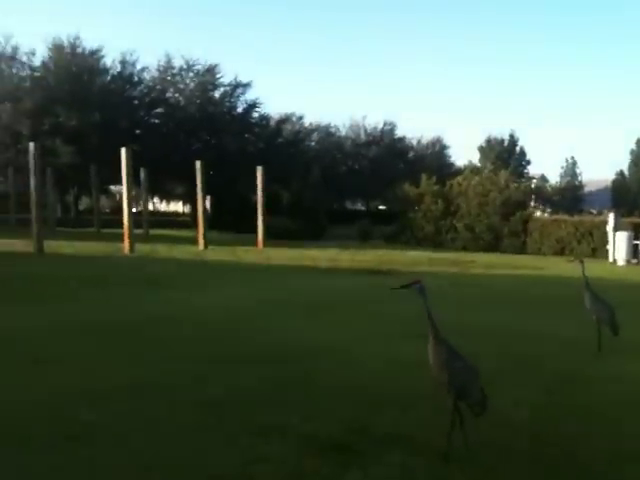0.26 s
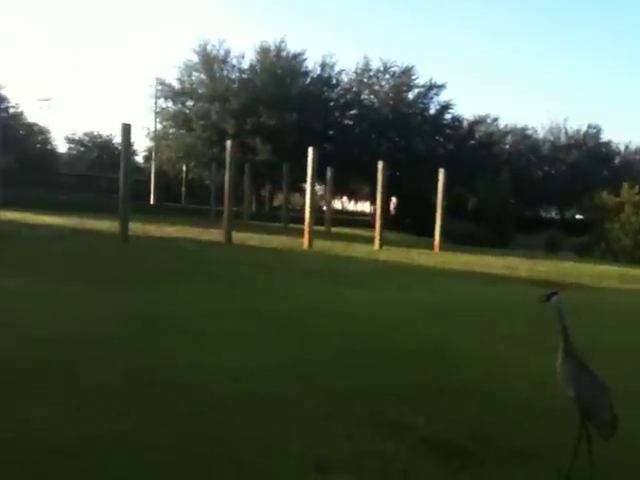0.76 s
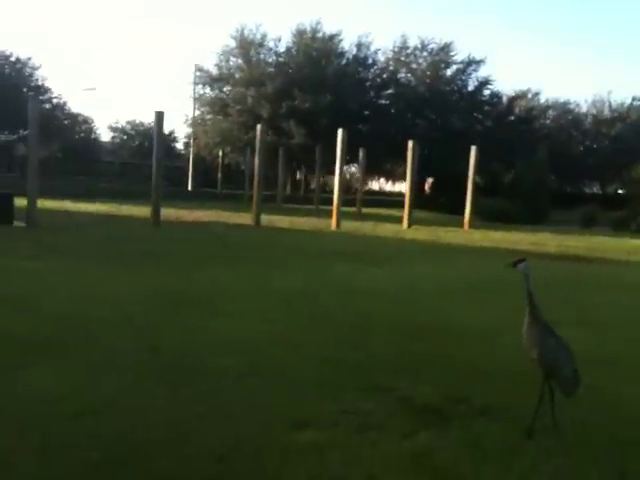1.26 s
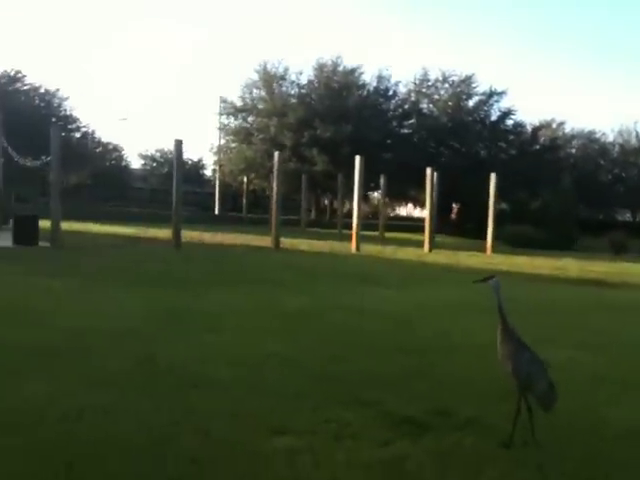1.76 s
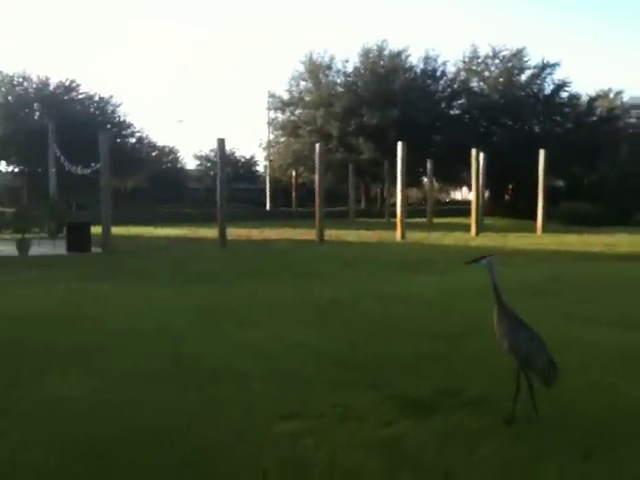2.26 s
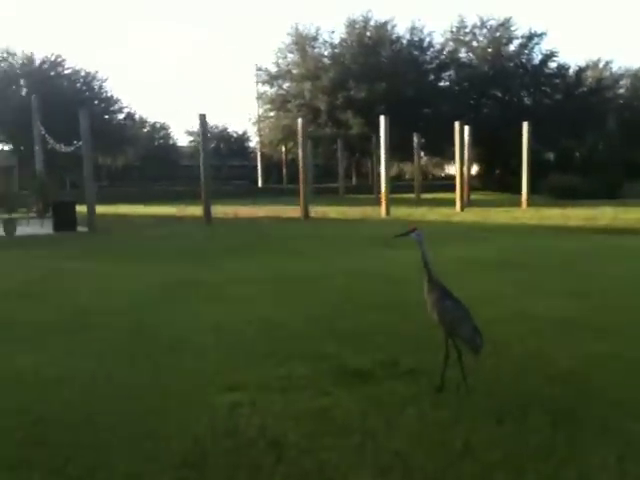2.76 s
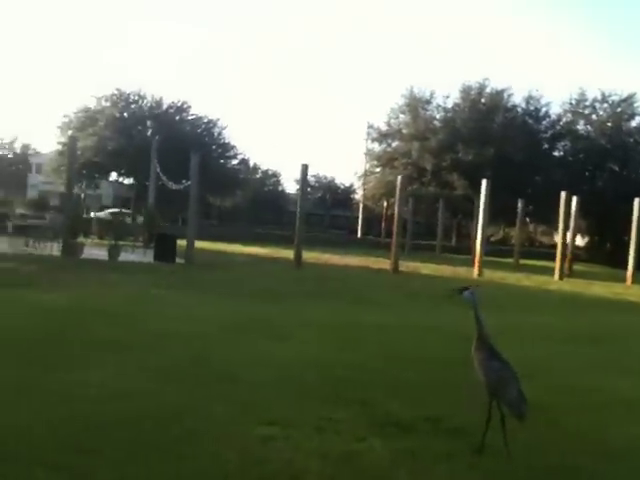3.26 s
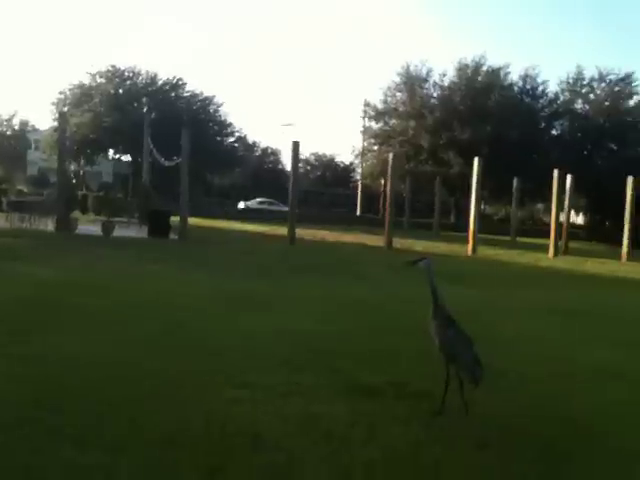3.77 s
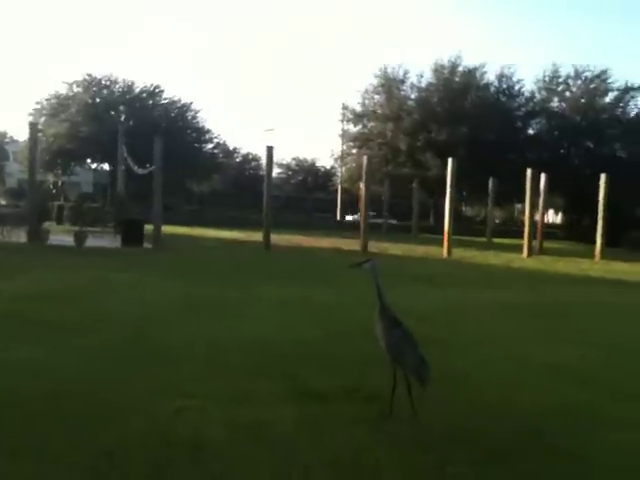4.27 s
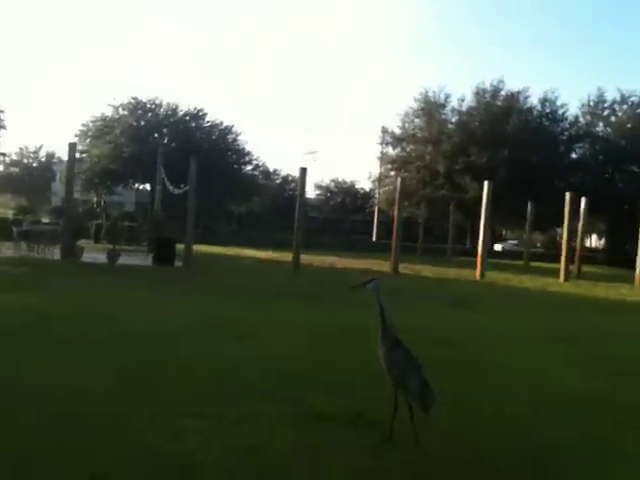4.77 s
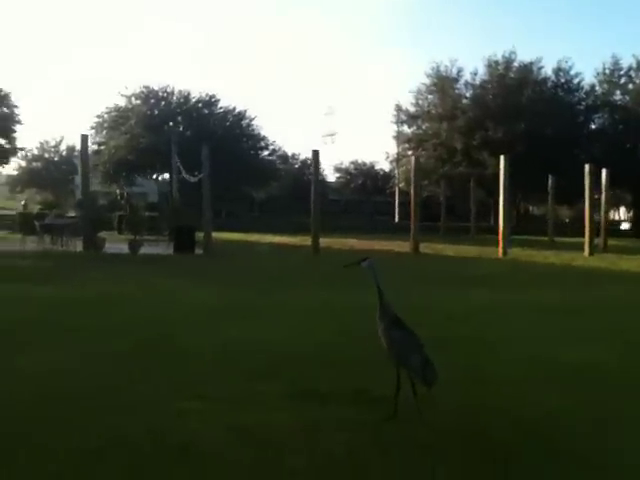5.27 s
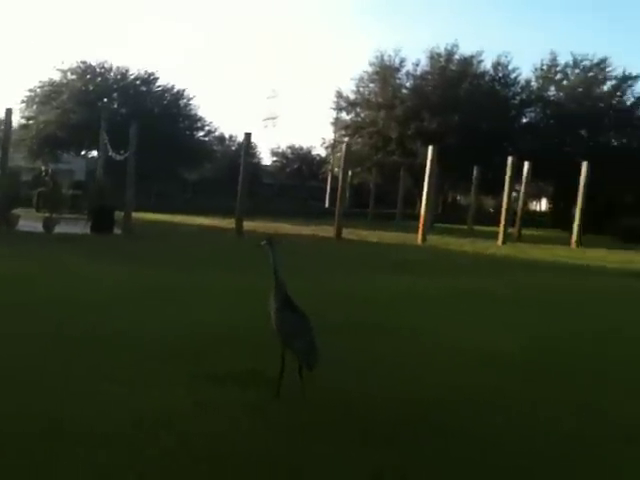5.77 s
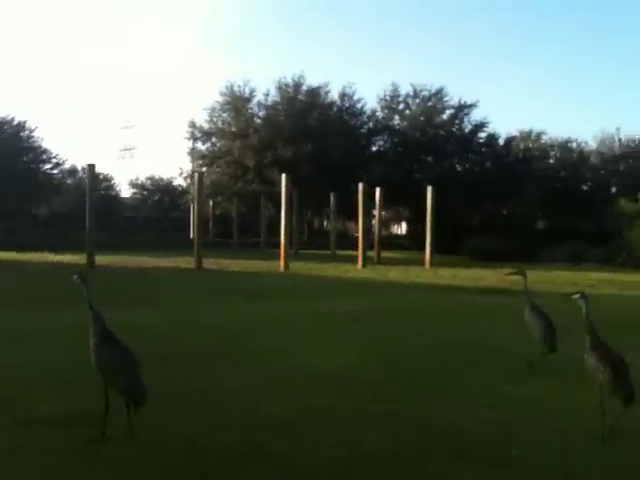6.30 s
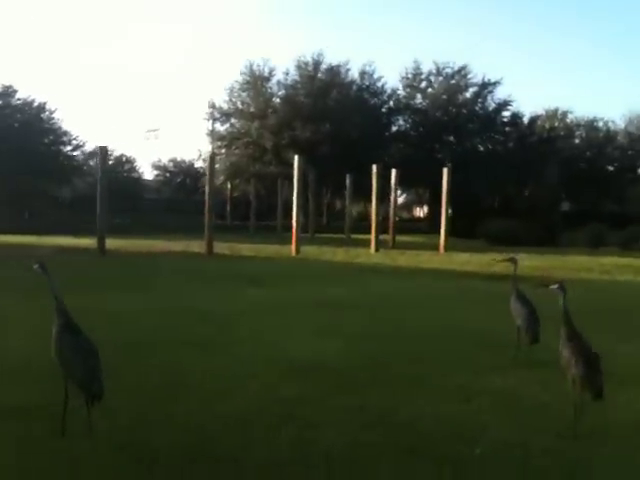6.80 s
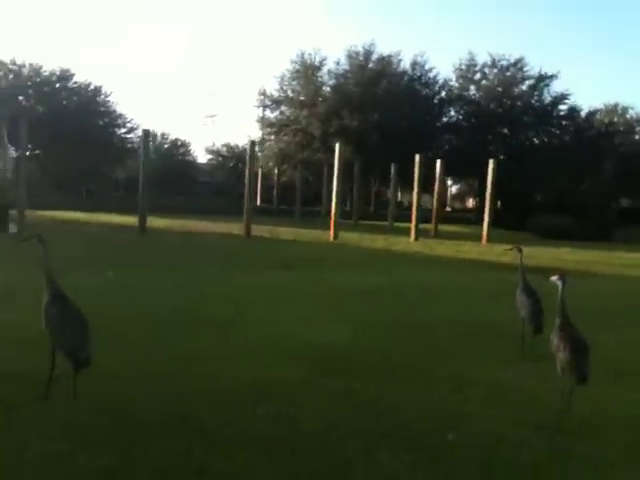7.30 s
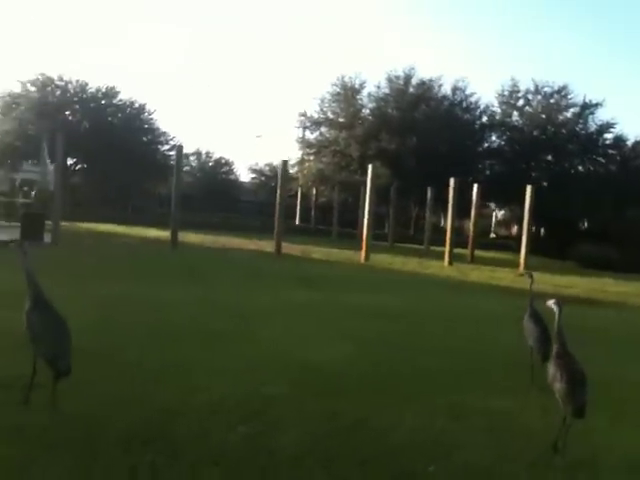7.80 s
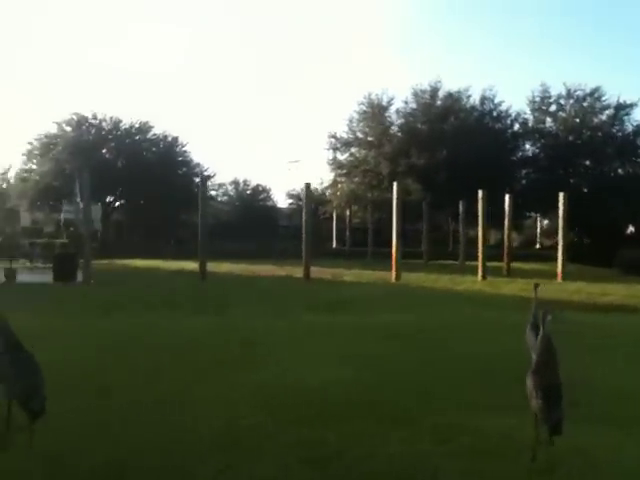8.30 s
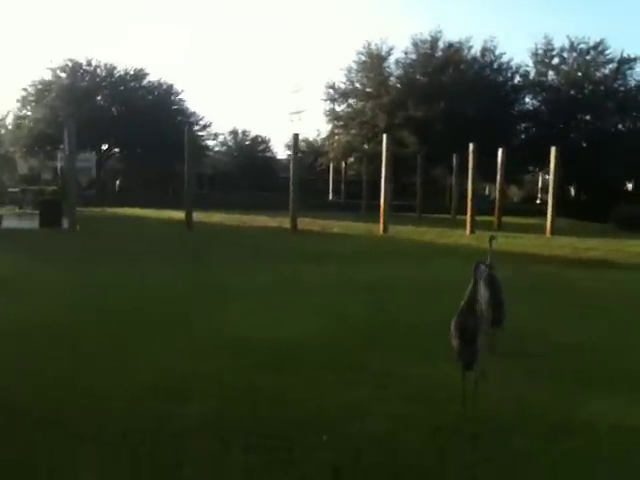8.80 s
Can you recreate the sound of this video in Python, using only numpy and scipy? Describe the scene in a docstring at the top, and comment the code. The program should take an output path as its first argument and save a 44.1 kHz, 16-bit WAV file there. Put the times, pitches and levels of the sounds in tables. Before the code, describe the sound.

Loud, rolling rattles from a pair of cranes come in four short duets outdoors. One bird leads with a brief honk and a run of quick bugling notes that sink and fade, and its higher partner answers before it finishes. The birds sound near the microphone and echo faintly off the trees. Between duets there is only a quiet low hum, far traffic and, in the first few seconds, two faint distant hoots.

```python
"""Two sandhill cranes duetting on a lawn.

Four duets: each bird gives a short rising honk, then a rattle of about 17 notes a second.
Each note is a bugle blast from snapping membranes, then weaker surges as the long windpipe rings on.
The lower bird leads, the higher one answers. Trees and houses echo them
over a low hum, a distant road and two faint hoots."""
import sys
import numpy as np
from scipy import signal
from scipy.fft import rfft, irfft
from scipy.io import wavfile

SR = 44100
rng = np.random.default_rng(int(sys.argv[2]) if len(sys.argv) > 2 else 0)


def waveform_to_disk(signal):
    """Save audio, clipped to [-1, 1], as 16-bit WAV at the path in sys.argv[1]."""
    frames = np.transpose(np.atleast_2d(signal))
    scaled = np.clip(frames, -1, 1) * 32767
    samples = np.round(scaled).astype(np.int16)
    wavfile.write(sys.argv[1], SR, samples)


N = 399105
TOP_HZ = 16200


def undb(db):
    """Decibels to gain."""
    return 10 ** (np.asarray(db) / 20)


def colour_db(hz, points):
    """Interpolate (Hz, dB) points on a log-frequency axis."""
    point_hz, db = np.transpose(points)
    return np.interp(np.log(hz + 1), np.log(point_hz), db)


def tint(x, points):
    """Equalise by (Hz, dB) points."""
    hz = np.fft.rfftfreq(len(x), 1 / SR)
    return irfft(rfft(x) * undb(colour_db(hz, points)), len(x))


def walk(size, rate_hz):
    """Smooth random drift, spread near 1."""
    at = np.arange(size) * rate_hz / SR
    knots = int(at[-1]) + 2
    return np.interp(at, np.arange(knots), rng.standard_normal(knots))


def resonate(x, hz, width_hz):
    """One resonance, unity gain at its centre."""
    return signal.lfilter(*signal.iirpeak(hz, hz / width_hz, fs=SR), x)


def add(track, start_s, sound):
    """Mix a sound into a track."""
    i = int(start_s * SR)
    track[i:i + len(sound)] += sound[:N - i]


# Overtone colour of each throat. Each row: frequency in Hz, gain in dB.
LOW_THROAT = [(1100, 11.5), (1450, -4.5), (1800, 1.5), (2150, -2.5), (2450, -12), (2900, -0.5),
              (3700, -1.5), (4600, -3), (5500, -3.5), (7000, -9.5), (10000, -16), (15000, -22.5)]
HIGH_THROAT = [(1200, 8), (1500, -8), (1750, 0.5), (2050, -2.5), (2450, -15.5), (3200, -2), (4300, -2),
               (6400, -3.5), (7500, -10.5), (10000, -13.5), (15000, -27.5)]

def syrinx(hz, throat, edge_db, turbulence):
    """Membranes snap shut once a cycle; returns the fundamental and the turbulent overtones."""
    phase = 2 * np.pi * (np.cumsum(hz) / SR + rng.random())
    k = np.arange(2, 30)[:, None]
    # A harder snap (edge) lifts the top octaves.
    top = np.clip(np.log(k * hz / 2300) / np.log(9000 / 2300), 0, 1)
    overtone_db = colour_db(k * hz, throat) + top * edge_db + 1.7 * rng.standard_normal(k.shape)
    gains = undb(overtone_db) * (k * hz < TOP_HZ)
    shake = np.array([walk(len(hz), 910) + 1j * walk(len(hz), 900) for _ in k])
    flutter = 1 + turbulence * (1 + top) * shake
    overtones = gains * np.real(flutter * np.exp(1j * k * (phase + np.pi / 4)))
    return -np.sqrt(2) * np.cos(phase), -np.sqrt(2) * overtones.sum(axis=0)


# Rattles. Each row: start in seconds, end in seconds, note count, pitch in Hz, share of pitch lost,
# level in dB, fade in dB, rasp (all overtones) in dB, edge (top overtones) in dB,
# later surges in dB, closing pitch in Hz, closing level in dB.
LOW_RATTLES = [(.6196, 1.031, 8, 953, 0.13, -12, 7, -14.5, 0, -14.5, 548, -36.5),
               (3.2571, 3.676, 8, 975.6, .12, -14.5, 11.5, -15.5, 2.5, -10.5, 520, -40.5),
               (5.5986, 5.961, 7, 961, 0.11, -18, 8, -16, -8, -9.5, 498, -40),
               (7.5635, 7.925, 7, 963, 0.12, -20, 8, -14.5, -8, -6.5, 547, -40.5)]
HIGH_RATTLES = [(.8275, 1.357, 10, 1126, .17, -23.5, 1.5, -8, -5.5, -4, 650, -37.5),
                (3.4985, 4.0335, 10, 1110, 0.16, -20, 5.6, -9, -2.5, -6, 645, -35.5),
                (6.0575, 6.5345, 9, 1066, .1, -20.5, 5, -9.5, -14.5, -7, 616.4, -40.5),
                (7.9322, 8.405, 9, 1067, 0.05, -17, 5.1, -10, -28.5, -13.5, 851, -31)]
# How each bird starts, tires and closes a rattle: keywords of breath_notes.
LOW_HABIT = dict(sag_power=2, fade_power=3.2, soft_start_db=-0.25, flat_start=0.0097, rasp_gain_db=4, edge_loss_db=3.5, surge_gain_db=6.5, soft_surge_db=-1.5, close_rasp_db=-16, close_edge_db=-13.5, close_surge_db=-6)
HIGH_HABIT = dict(sag_power=3.53, fade_power=3.1, soft_start_db=4.5, flat_start=0.027, rasp_gain_db=0, edge_loss_db=0.6, surge_gain_db=2.5, soft_surge_db=5.5, close_rasp_db=-9.5, close_edge_db=-26, close_surge_db=-9)
# Note-to-note spread: share of pitch, then level, rasp, edge and later surges in dB.
NOTE_SCATTER = (.011, .5, .9, 1.2, 1.4)

def breath_notes(rattles, quicken, close_late_s, sag_power, fade_power, soft_start_db, flat_start,
                 rasp_gain_db, edge_loss_db, surge_gain_db, soft_surge_db,
                 close_rasp_db, close_edge_db, close_surge_db):
    """One breath drives notes that quicken, sink and fade, then a low closing note."""
    for (start_s, end_s, count, hz, sag, db, fade_db,
         rasp_db, edge_db, surge_db, close_hz, close_db) in rattles:
        gaps = np.arange(1, count) ** -quicken
        gaps_s = gaps * (end_s - close_late_s - start_s) / gaps.sum()
        for k, spent in enumerate(np.linspace(0, 1, len(gaps_s))):
            cold = np.exp(-k / 0.5)
            tired = spent ** fade_power
            off_pitch, off_db, off_rasp, off_edge, off_surge = NOTE_SCATTER * rng.standard_normal(5)
            yield (start_s + gaps_s[:k].sum(),
                   hz * (1 - sag * spent ** sag_power - flat_start * cold + off_pitch),
                   db - fade_db * tired - soft_start_db * cold + off_db,
                   rasp_db + rasp_gain_db * tired + off_rasp,
                   edge_db - edge_loss_db * tired + off_edge,
                   surge_db + surge_gain_db * tired + soft_surge_db * cold + off_surge)
        yield end_s, close_hz, close_db, close_rasp_db, close_edge_db, close_surge_db


# Blast and surges of one note. Each row: delay in seconds, length in seconds, share of pitch,
# tone in dB, overtones in dB.
LOW_SURGES = [(0, 0.00849, 0.95, 1, -0.5), (.0066, 0.00622, 0.926, -0.5, -0.5),
              (0.0114, 0.0079, .69, -4.5, -3), (.0135, .007, 0.98, -1, -7.5),
              (.018, 0.0125, .65, -12.5, -15.5)]
HIGH_SURGES = [(0, 0.0079, 0.99, 3, 0.5), (.006, 0.00788, .9, -1, 1.5), (0.0106, .0085, .86, -0.5, 1),
               (.017, .012, 0.76, -14.5, -14.5)]
# Windpipe resonances. Each row: centre in Hz, width in Hz, gain in dB.
LOW_PIPE = [(593.5, 32, 3.5), (840, 25, -6), (1050, 43, 0.5)]
HIGH_PIPE = [(871, 6.7, -8), (1806, 130, -4), (2704, 166, 1)]

def rattle(notes, throat, surges, pipe, turbulence, tail_turbulence, tail_edge_db, puff_db):
    """Each note is a hard blast; pressure returning along the windpipe drives duller surges after it."""
    track = np.zeros(N)
    lead_s, lead_share, lead_db = 0.009, 0.837, -19
    lead_t = np.arange(int(lead_s * SR)) / SR
    for start_s, pitch_hz, db, rasp_db, edge_db, tail_db in notes:
        # The membranes swing softly before they snap.
        lead_in = np.hanning(len(lead_t)) * np.sin(2 * np.pi * lead_share * pitch_hz * lead_t)
        add(track, start_s - 0.8 * lead_s, undb(db + lead_db) * lead_in)
        for j, (delay_s, length_s, share, tone_db, overtone_db) in enumerate(surges):
            in_tail = j > 0
            u = np.linspace(0, 1, int(length_s * SR))
            centre_hz = pitch_hz * share * (1 + 0.034 * in_tail * rng.standard_normal())
            hz = centre_hz * (1 + 0.02 * (0.5 - u) + 0.016 * (1 + in_tail) * walk(len(u), 700))
            roughness = tail_turbulence if in_tail else turbulence
            tone, overtones = syrinx(hz, throat, edge_db + in_tail * tail_edge_db, roughness)
            body = undb(tone_db) * tone * np.abs(np.sin(np.pi * u)) ** 0.68
            # The snap peaks before the tone and carries a slight puff of air.
            snap_envelope = np.abs(np.sin(np.pi * u ** 0.82)) ** 1.07
            snap = undb(rasp_db + overtone_db) * (overtones + undb(puff_db)) * snap_envelope
            add(track, start_s + delay_s, undb(db + min(j / 2, 1) * tail_db) * (body + snap))
    return track + sum(undb(db) * resonate(track, hz, width_hz) for hz, width_hz, db in pipe)


# Opening honks. Each row: start in seconds, length in seconds, pitch reached in Hz,
# level in dB, rasp in dB, edge in dB.
LOW_HONKS = [(.491, 0.059, 572, -27.5, -7, -5), (3.128, 0.062, 566, -27, -8, -8),
             (5.465, 0.063, 565.6, -26, -9, -17.5), (7.432, 0.067, 575.6, -28.5, -6, -18)]
HIGH_HONKS = [(.715, 0.038, 642, -37, -1.5, -17), (3.385, 0.038, 619, -28, -9.5, -22),
              (5.935, 0.055, 631, -38, 0, -28), (7.812, 0.052, 656, -31, -3, -31)]

def honks(calls, throat):
    """A clear note rises, brightens and ends in a hoarse catch; the windpipe rings on."""
    track = np.zeros(N)
    for start_s, length_s, pitch_hz, db, rasp_db, edge_db in calls:
        u = np.linspace(0, 1, int(length_s * SR))
        catch = np.clip((u - 0.72) / 0.208, 0, 1)
        rise = 1 - 0.2 * np.clip(1 - u / 0.708, 0, 1) ** 1.716
        jitter = 1 + (0.017 + 0.0476 * catch) * walk(len(u), 505)
        hz = pitch_hz * rise * jitter
        tone, overtones = syrinx(hz, throat, edge_db - 20 * np.abs(u - 0.65), 0.072 + 0.32 * catch)
        effort = np.interp(u, [0, 0.2, 0.7, 0.88, 1], [0.11, 0.53, 0.75, 0.61, 0.082])
        fullness = (hz / pitch_hz) ** 2.5  # the fundamental climbs into the windpipe's resonance
        add(track, start_s, undb(db) * effort * (fullness * tone + undb(rasp_db) * effort * overtones))
    return track + undb(-13) * resonate(track, hz=578, width_hz=40)


# Bills turning away from the listener. Each row: time in seconds, gain of the extra treble.
BILL_TURNS = [(0, .1), (4.5, 0.067), (5.5, 1.8), (7.5, 0.64), (8.097, 4.1), (9.05, 12)]

def thrown_treble(birds):
    """A bill pointing away throws more treble at the trees."""
    turned = np.interp(np.arange(N) / SR, *np.transpose(BILL_TURNS))
    return turned * tint(birds, [(1500, -54), (4000, -11), (8000, 7), (11000, 13.5), (14000, 15)])


# Echo colour of trees and houses. Each row: frequency in Hz, gain in dB.
ECHO_COLOUR = [(300, 8.5), (600, 3.5), (1000, 6.5), (2000, 7), (4500, 5.5), (7000, -1), (15000, -3.5)]

def echo(x, early_db, early_s, far_db, t60_low_s, t60_high_s):
    """Early scatter from the lawn and a thin tail from the trees."""
    t = np.arange(int(1.3 * SR)) / SR
    noise = tint(rng.standard_normal(len(t)), ECHO_COLOUR)
    treble_noise = tint(rng.standard_normal(len(t)), ECHO_COLOUR)
    low = signal.sosfilt(signal.butter(2, 2500, fs=SR, output="sos"), noise)
    high = signal.sosfilt(signal.butter(2, 2500, "high", fs=SR, output="sos"), treble_noise)
    onset = np.clip(t / 0.021, 0, 1)
    far = (low * undb(-60 * t / t60_low_s) + high * undb(-60 * t / t60_high_s)) * onset
    early = noise * t / early_s * np.exp(1 - t / early_s)
    response = sum(undb(db) * h / np.linalg.norm(h) for db, h in [(early_db, early), (far_db, far)])
    return signal.fftconvolve(x, response)[:N]


# Background spectrum. Each row: frequency in Hz, relative density in dB.
AIR_COLOUR = [(15, -90), (25, -53), (38, -30), (134, -6), (229, 0.5), (277, -4.5), (335, -15.5),
              (363, -9.5), (405, -11.5), (545, -21.5), (887, -15), (1840, -23.5), (6380, -41.5),
              (14800, -48), (16000, -46.5)]
# Road swells. Each row: peak time in seconds, half width in seconds, rise in dB.
ROAD_SWELLS = [(.4, 0.48, 1), (2.42, .22, 3.5), (2.98, 0.25, 3.5), (6.8, 0.34, 2)]

def background():
    """A low hum and a swelling distant road ebb slowly under faint hiss and a thin whine."""
    t = np.arange(N) / SR
    air = tint(rng.standard_normal(N), AIR_COLOUR)
    air *= undb(-49) / np.sqrt(np.mean(air ** 2))
    rumble = tint(air, [(290, 1), (400, -34)])
    hiss = tint(air, [(3000, -44), (7000, -1.5)])
    middle = air - rumble - hiss
    road = tint(middle, [(300, 0.5), (390, -4), (520, 1), (900, -1.5), (1300, 1.5), (2500, 0.5)])
    hum = tint(rumble, [(45, -3.5), (90, -1), (125, -0.5), (170, 1), (205, -0.5),
                        (245, -1), (295, -1.5), (335, -3), (385, -5)])
    swells_db = sum(db * np.exp(-((t - peak_s) / width_s) ** 2) for peak_s, width_s, db in ROAD_SWELLS)
    hum_db = 1.26 - 0.36 * t + 0.6 * walk(N, 7)
    road_db = -1 - 0.34 * t + swells_db + 0.6 * walk(N, 4)
    whine_hz = 15000 + 60 * walk(N, 300)
    whine = undb(-80) * np.sin(2 * np.pi * np.cumsum(whine_hz) / SR)
    return hum * undb(hum_db) + road * undb(road_db) + hiss + whine


# Distant hoots. Each row: start in seconds, length in seconds, first and last pitch in Hz, level in dB.
HOOTS = [(0.166, 0.242, 407, 485, -56.5), (2.539, 0.156, 474, 446, -58.5)]

def hoots():
    """Faint, wavering tones from far away."""
    track = np.zeros(N)
    for start_s, length_s, start_hz, end_hz, db in HOOTS:
        size = int(length_s * SR)
        hz = np.linspace(start_hz, end_hz, size) * (1 + 0.042 * walk(size, 90))
        envelope = undb(db) * np.sqrt(2 * np.hanning(size))
        add(track, start_s, envelope * np.sin(2 * np.pi * np.cumsum(hz) / SR))
    return track


def scene():
    """Both birds, their echo and the background, in mono."""
    low_notes = breath_notes(LOW_RATTLES, quicken=0.135, close_late_s=0.005, **LOW_HABIT)
    high_notes = breath_notes(HIGH_RATTLES, quicken=0.15, close_late_s=0, **HIGH_HABIT)
    leader = rattle(low_notes, LOW_THROAT, LOW_SURGES, LOW_PIPE,
                    turbulence=0.52, tail_turbulence=0.97, tail_edge_db=-15, puff_db=-20.5)
    partner = rattle(high_notes, HIGH_THROAT, HIGH_SURGES, HIGH_PIPE,
                     turbulence=0.49, tail_turbulence=0.47, tail_edge_db=-18, puff_db=-30.5)
    birds = leader + partner + honks(LOW_HONKS, LOW_THROAT) + honks(HIGH_HONKS, HIGH_THROAT)
    echoes = echo(birds + thrown_treble(birds),
                  early_db=-20, early_s=0.0042, far_db=-23.5, t60_low_s=1.3, t60_high_s=1.0)
    return (birds + echoes + background() + hoots())[None]


def record(dry):
    """Steep low-pass at TOP_HZ."""
    return signal.sosfilt(signal.ellip(8, 0.2, 70, TOP_HZ, fs=SR, output="sos"), dry)


dry = scene()
out = record(dry)
waveform_to_disk(out)
```